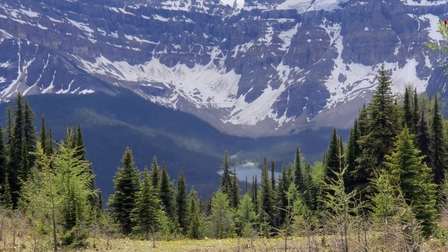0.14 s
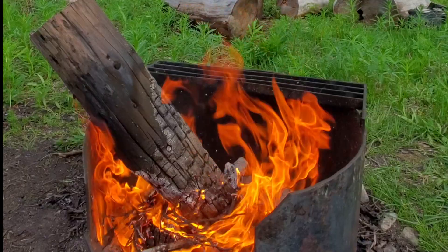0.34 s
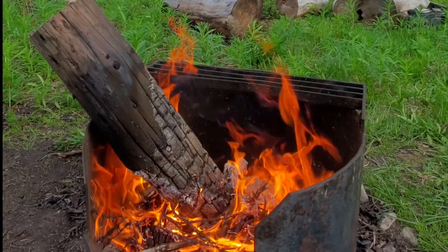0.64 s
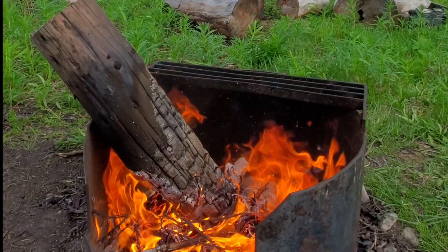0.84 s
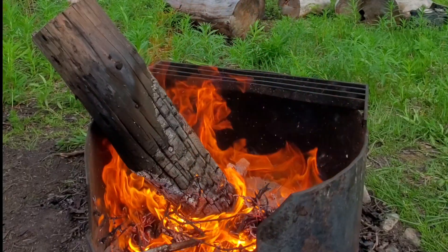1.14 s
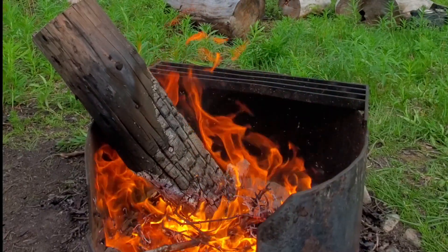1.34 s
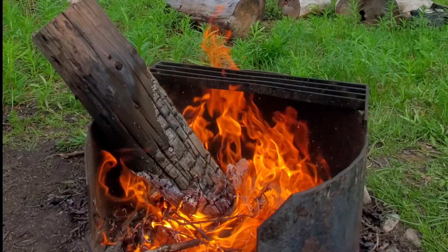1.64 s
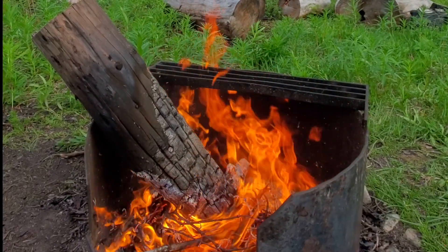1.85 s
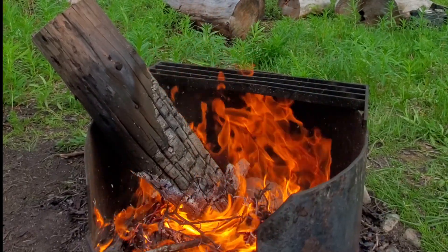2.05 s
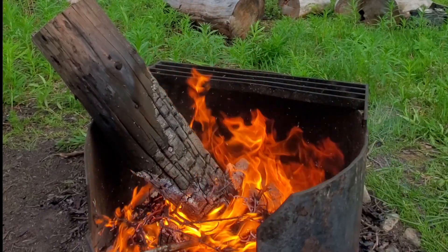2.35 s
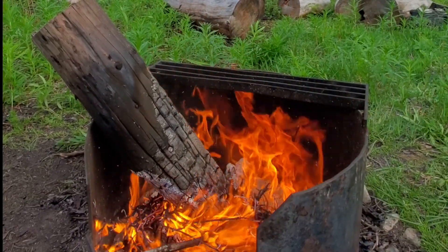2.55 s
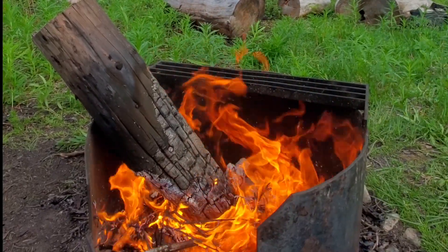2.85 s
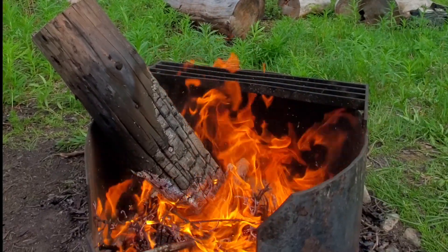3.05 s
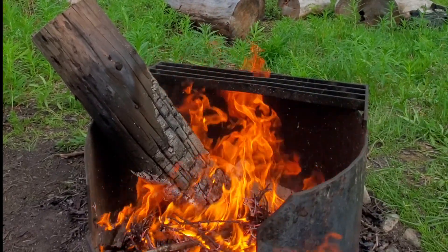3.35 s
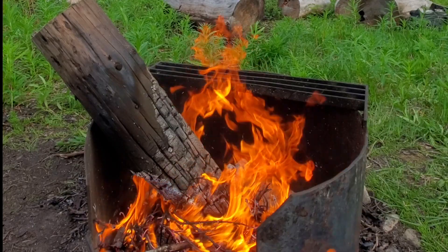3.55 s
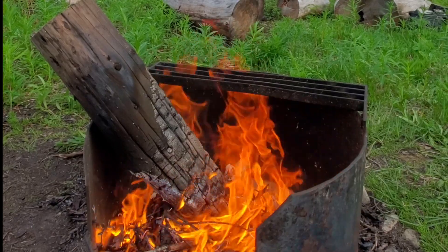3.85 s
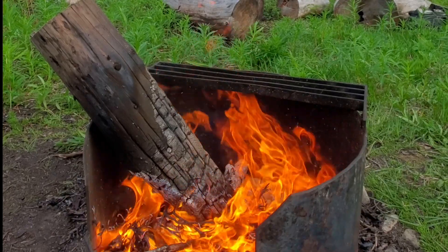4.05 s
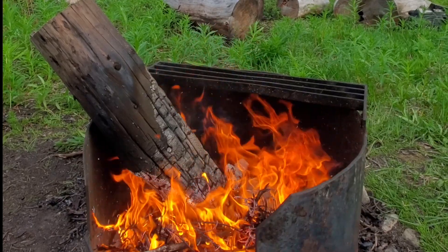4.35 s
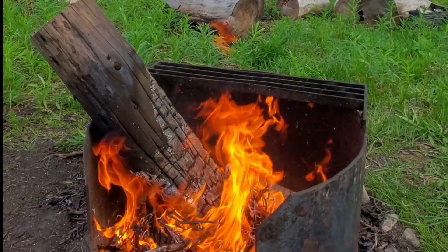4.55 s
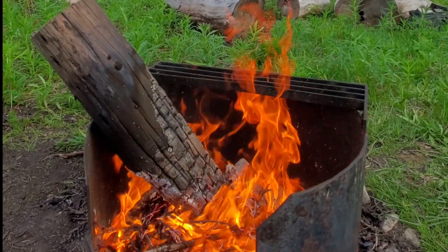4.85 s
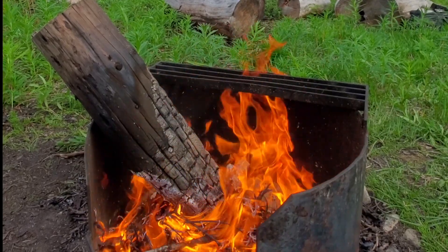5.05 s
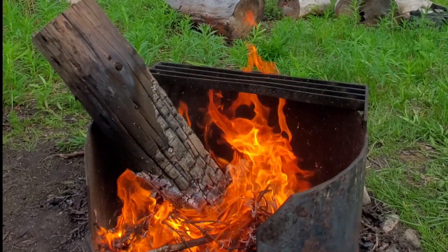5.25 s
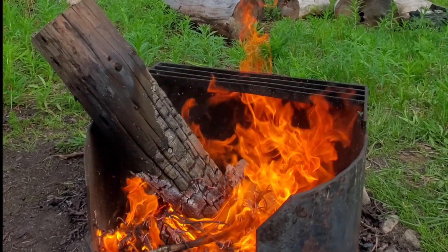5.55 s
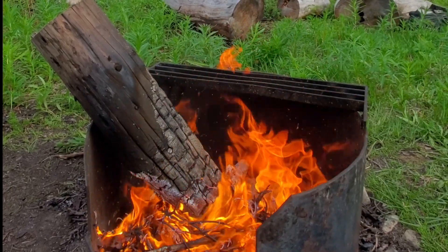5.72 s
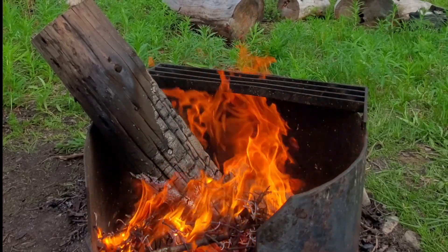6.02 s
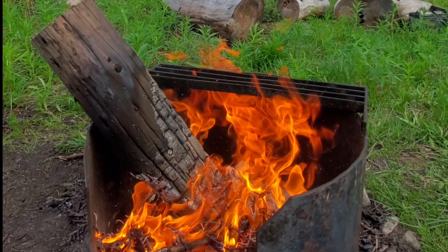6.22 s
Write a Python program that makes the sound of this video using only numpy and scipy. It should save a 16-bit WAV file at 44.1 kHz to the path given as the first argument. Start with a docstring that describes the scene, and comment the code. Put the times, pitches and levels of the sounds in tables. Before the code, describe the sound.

After a brief near-silence, a close outdoor wood fire snaps and crackles sharply over fluttering low rumble, soft hiss and tiny ember ticks.

```python
"""On a grassy campsite, a wood fire burns in a steel fire ring close to a pair of microphones. Gas pockets
burst in the logs: each crack is a short noise that scatters round the ring, rings its hollow and fades in the
clearing. Tiny ticks of the same kind come from the embers. Under them, noise swelling with the breeze makes the
flames flutter and rumble, and the wood hisses. A very faint, even noise comes first; the fire fades in after a
quarter of a second."""
import sys
import numpy as np
from scipy import signal
from scipy.fft import rfft, irfft, next_fast_len
from scipy.io import wavfile
from scipy.ndimage import uniform_filter1d

SR = 44100
rng = np.random.default_rng(int(sys.argv[2]) if len(sys.argv) > 2 else 0)


def materialize(psi):
    """Save the field psi as 16-bit PCM at rate SR to the path in sys.argv[1].

    A 1-D psi becomes a single channel; in a 2-D psi each row is a channel.
    """
    bounded = np.clip(np.atleast_2d(psi).T, -1, 1)
    quanta = np.round(bounded * 32767).astype(np.int16)
    wavfile.write(sys.argv[1], SR, quanta)


N = 281358

# samples that a burst's buffer keeps ahead of its attack
LEAD = 32


def undb(db):
    """Turn decibels into gain."""
    return 10 ** (np.asarray(db) / 20)


def curves(table):
    """Draw each column of a table as one value per sample; the first column is the time in seconds."""
    s, *columns = np.transpose(table)
    return [np.interp(np.arange(N) / SR, s, column) for column in columns]


def unit(x):
    """Scale to an rms of 1."""
    return x / np.sqrt(np.mean(x ** 2))


def colour(x, points):
    """Filter with the gain of (Hz, dB) points; the cepstrum keeps it from sounding ahead of time."""
    n = 2 * next_fast_len(x.shape[-1] * 2 // 3)
    hz, db = np.transpose(sorted(points))
    bins_hz = np.maximum(np.arange(n // 2 + 1) * SR / n, 1)
    gain = undb(np.interp(np.log(bins_hz), np.log(hz), db))
    cepstrum = irfft(np.log(gain), n)
    # fold the second half onto the first
    cepstrum[1:n // 2] *= 2
    cepstrum[n // 2 + 1:] = 0
    response = np.exp(rfft(cepstrum))
    return irfft(rfft(x, n) * response, n)[..., :x.shape[-1]]


def walk(rate):
    """Wander through random levels, each held for 1 / rate seconds, then smoothed twice; rms 1."""
    k = max(int(SR / rate), 1)
    held = np.repeat(rng.standard_normal(N // k + 1), k)
    smooth = uniform_filter1d(uniform_filter1d(held, k), k)
    return unit(smooth[:N])


def noise_pair(size, likeness):
    """White noise for two microphones that share a part of it."""
    shared = np.clip(likeness, 0, 1)
    z = rng.standard_normal((3, size))
    return np.sqrt(shared) * z[0] + np.sqrt(1 - shared) * z[1:]


def burst(envelope, likeness):
    """Noise under an envelope, with an energy of 1 in each channel."""
    x = noise_pair(len(envelope), likeness) * envelope
    return x / np.sqrt(np.sum(x ** 2, axis=1, keepdims=True))


def even(x, order=19):
    """Spread a burst's energy smoothly over frequency and start it LEAD samples in."""
    spectrum = rfft(np.roll(x, LEAD, axis=1))
    power = uniform_filter1d(np.mean(np.abs(spectrum) ** 2, axis=0), order)
    return irfft(spectrum / np.sqrt(power), x.shape[1])


def steady(x, size):
    """Even out the swells of a noise that are slower than size samples."""
    return x / np.sqrt(uniform_filter1d(np.mean(x ** 2, axis=0), size) + 1e-12)


def sides(lean_db):
    """Left and right gains of a sound that leans to one side, at constant power."""
    gains = undb(np.vstack([lean_db, -lean_db]) / 2)
    return gains / np.sqrt(np.mean(gains ** 2, axis=0))


def swells(table):
    """Summed power at each microphone of bell-shaped swells, one per row of the table."""
    t = np.arange(N) / SR
    power = np.zeros((2, N))
    for s, length, db, lean_db in table:
        bell = np.exp(-2 * ((t - s) / length) ** 2)
        power += (sides(lean_db) * undb(db) * bell) ** 2
    return power


def add(out, s, x):
    """Mix a burst in so that its attack falls at time s."""
    i = int(np.clip(s * SR - LEAD, 0, N - 1))
    out[:, i:i + x.shape[1]] += x[:, :N - i]


# The colour of the faint noise. Each row: frequency in Hz, relative level in dB.
HUSH_COLOUR = [(30, 2), (480, -3.5), (650, -2), (850, 4), (1050, -8.5), (8000, -24)]


def hush():
    """A very faint, even noise under everything."""
    return unit(colour(noise_pair(N, likeness=0.29), HUSH_COLOUR)) * undb(-75.0)


# The draught that feeds the flames builds, dies down and builds again.
# Each row: time in seconds, airflow level in dB, left minus right in dB.
DRAUGHT_CURVE = [(0.27, -45.5, -1.5), (0.8, -43, -4), (1.35, -46, -3.5), (1.7, -32.5, -1),
                 (1.95, -32.5, -1.5), (2.3, -28.5, 4), (2.7, -36.5, 17), (3.0, -29, 4), (3.35, -31.5, 10),
                 (3.52, -37.5, -16), (3.68, -61, -5), (4.28, -56, -26), (4.52, -40.5, -9), (4.87, -38, -20),
                 (5.08, -29, 1), (5.3, -26, -5), (5.72, -36.5, -4), (6.37, -41, -7)]
# Single gusts that buffet the microphones. # Each row: peak in seconds, seconds from the peak to 17 dB below
# it, airflow level in dB, # left minus right in dB.
GUST_SWELLS = [(0.94, .14, -38.5, 8), (1.25, 0.061, -37.5, -8), (1.51, 0.39, -34.5, 4),
               (1.73, 0.04, -25.5, 15), (2.385, 0.094, -28.5, 17), (2.525, .07, -23.5, 10),
               (2.648, 0.087, -20.5, 22), (2.825, 0.097, -26.5, 6), (3.127, 0.034, -18.5, 24),
               (3.254, 0.079, -17.5, 31), (3.347, 0.091, -28.5, -9), (3.596, 0.049, -32.5, -6),
               (3.793, .11, -34.5, -1), (4.039, 0.096, -37, -0.5), (6.118, .05, -34, -4),
               (6.296, 0.042, -40, 8)]


def breeze():
    """The moving air at each microphone: the powers of draught and gusts add up."""
    draught_db, lean_db = curves(DRAUGHT_CURVE)
    draught = sides(lean_db) * undb(draught_db)
    return np.sqrt(draught ** 2 + swells(GUST_SWELLS))


# The colour of the deep rumble. Each row: frequency in Hz, relative level in dB.
RUMBLE_COLOUR = [(12, -21), (25, -20), (42, -3.5), (80, -1), (115, -9), (200, -19), (350, -37.5),
                 (900, -90)]


def rumble(airflow, puffs):
    """The deep rumble of the flames: low noise that grows in step with the airflow."""
    noise = colour(noise_pair(N, likeness=0.081), RUMBLE_COLOUR)
    return undb(2.2) * airflow * steady(noise * undb(2.26 * puffs), size=2800)


# The colour of the higher roar. Each row: frequency in Hz, relative level in dB.
ROAR_COLOUR = [(50, -16), (130, -2.5), (200, 2), (280, -9), (400, -18), (600, -28), (1200, -37),
               (4000, -75)]
# the roar's level at a reference airflow, and the dB it gains per dB of airflow
ROAR_DB, REFERENCE_AIRFLOW_DB, ROAR_SLOPE = -43.5, -36, 0.6


def roar(airflow, puffs):
    """The higher roar of the flames grows more slowly with the airflow and flutters faster."""
    gain = undb(ROAR_DB) * (airflow / undb(REFERENCE_AIRFLOW_DB)) ** ROAR_SLOPE
    noise = colour(noise_pair(N, likeness=0.25), ROAR_COLOUR)
    return gain * steady(noise * undb(3.9 * puffs + 2 * walk(120)), size=3600)


# Tongues of flame that flare up and flap.
# Each row: peak in seconds, seconds from the peak to 17 dB below it, level in dB, left minus right in dB.
FLARE_SWELLS = [(3.11, 0.067, -41, 11), (3.27, .11, -36, 11), (4.99, 0.088, -40, -6), (5.29, 0.1, -36, 0),
                (5.52, 0.12, -41, 0)]
# The colour of a flaring tongue. Each row: frequency in Hz, relative level in dB.
FLARE_COLOUR = [(80, -17.5), (220, 1), (310, 1.5), (450, -8), (700, -18), (1200, -32), (4000, -62)]


def flares(puffs):
    """Flaring tongues of flame: short bell-shaped swells of fluttering noise."""
    noise = colour(noise_pair(N, likeness=0.27), FLARE_COLOUR)
    flutter = steady(noise * undb(5.0 * puffs), size=3600)
    return np.sqrt(swells(FLARE_SWELLS)) * flutter


def flames():
    """Eddies of hot gas: the same puffs swell the rumble, the roar and the flaring tongues."""
    airflow = breeze()
    puffs = walk(70)
    return rumble(airflow, puffs) + roar(airflow, puffs) + flares(puffs)


# Gas streaming out of the wood. Each row: time in seconds, level in dB before a lift of 7.5 dB.
GAS_CURVE = [(0.27, -59.5), (0.84, -62.5), (2.55, -59.5), (3.06, -60.5), (3.68, -67), (3.84, -64.5),
             (4.28, -67.5), (4.9, -58.5), (5.16, -63), (5.4, -60.5), (6.37, -59)]
# The colour of the hiss. Each row: frequency in Hz, relative level in dB.
HISS_COLOUR = [(100, -7), (350, 9), (510, 13), (750, 3.5), (1100, 4), (2000, -1.5), (3200, -8.5),
               (4500, -11.5), (5400, -15), (6700, -12), (8700, -25), (10500, -14.5), (16000, -18)]


def hiss():
    """Gas and steam stream out of the wood with a fine, restless sizzle."""
    gas_db, = curves(GAS_CURVE)
    jet = noise_pair(N, likeness=0.28) * undb(2.04 * walk(25) + 1.63 * walk(500))
    return unit(colour(jet, HISS_COLOUR)) * undb(gas_db + 7.5)


# The colour of a crack inside the ring. Each row: frequency in Hz, gain in dB.
CRACK_COLOUR = [(60, -31.5), (200, -9.5), (400, 3.5), (550, 2.5), (760, -4), (1000, -8), (1650, -2.5),
                (2600, -3.5), (3300, -4), (4400, -0.5), (5300, -6), (6400, -1), (8500, -5.5), (11500, 3),
                (16000, -6.5)]
# The two air resonances of the steel ring.
# Each row: frequency in Hz, starting level in dB, seconds to fade by 60 dB.
HOLLOW_TONES = [(217, -30, 0.042), (498, -39, .028)]


def surroundings(cracks):
    """The ring colours the cracks and its hollow rings briefly; ground and trees return a faint tail."""
    cracks = colour(cracks, CRACK_COLOUR)
    t = np.arange(SR // 2) / SR
    onset = 1 - np.exp(-t / .004)
    # the two tails fade by 60 dB in 0.037 s and 0.51 s
    ring = burst(onset * undb(-60 * t / 0.037), likeness=0.16) * undb(-20.0)
    clearing = burst(onset * undb(-60 * t / 0.51), likeness=0) * undb(-27.5)
    echo = colour(ring + clearing, [(400, -1.5), (4500, -4.0), (9000, -15), (16000, -12)])
    low, high = (np.sin(2 * np.pi * hz * t) * undb(db - 60 * t / t60) for hz, db, t60 in HOLLOW_TONES)
    # the two tones have opposite signs: between their pitches the air swings against the direct sound
    return cracks + signal.fftconvolve(cracks, echo + low - high, axes=1)[:, :N]


def pop(body_db, top_db, tear_size, size=1024):
    """The wood splits, fibres tear for a moment, a splinter rings, and the steel walls scatter the crack."""
    ms = np.arange(size) / SR * 1000
    tear_size = max(tear_size, .1)
    tear_ms = 1.2 * tear_size
    split = burst(np.exp(-ms / 0.2), likeness=0.88)
    tear = burst(np.exp(-(ms / tear_ms) ** 2), likeness=0.77)
    scatter = burst((1 - np.exp(-ms / .5)) * np.exp(-ms / 2.22), likeness=0.27)
    # a long tear outweighs the first split
    crack = even(undb(-8.5) / np.sqrt(tear_size) * split + tear + undb(-3.5) * scatter)
    # every splinter has a pitch of its own
    splinter_hz = rng.uniform(3980, 7600)
    splinter = np.sin(2 * np.pi * splinter_hz * ms / 1000) * np.exp(-ms / 0.62)
    crack = crack + undb(-26.5) * np.roll(splinter, LEAD)
    return colour(crack, [(700, body_db - 1.0), (2200, body_db), (3900, 0.028), (6300, 0.0037), (9000, top_db)])


def embers(count=280):
    """Tiny bright ticks at random moments, most of them faint; all lean to the right."""
    out = np.zeros((2, N))
    for when, strength, woody, bright, side in rng.random((count, 5)):
        # the high power makes strong ticks rare
        db = -39 + 20 * strength ** 6
        tick = pop(-8 + 9 * woody, -3 + 9 * bright, tear_size=0.44, size=512)
        lean_db = 2.4 * (side - 1.5) * np.array([[1], [-1]])
        add(out, when * N / SR, tick * undb(db + lean_db))
    return out


# a deeper pocket tears for longer: relative tear at a body of 0 dB, and the body that doubles it
TEAR_SIZE, TEAR_DOUBLING_DB = 0.73, 16.5
# crumbs of char: mean delay, level below the pop, cap on that level, and random scatter added after it
CRUMB_DELAY_S, CRUMB_BELOW_DB, CRUMB_CAP_DB, CRUMB_SCATTER_DB = .025, 22.5, -23, 3.5
# The distinct bursts in the wood, before the colour of the ring.
# Each row: start in seconds, level in dB before a common lift, woody body in dB, bright top in dB,
# left minus right in dB.
POP_EVENTS = [(0.2758, -11.5, -6, -1, -12), (0.2979, -13.5, 0, 10, -5), (0.306, -4, -10, -10, 7),
              (0.3229, 0.5, -7.5, -3, -2), (0.411, 4, -16, -5, 0), (0.4271, -1, -4.5, -4, -1.5),
              (0.621, -8.5, -4, -3, -2), (0.6426, 5.5, 0.5, -3.5, 4.5), (0.6446, 9.5, 3, -5, -4),
              (0.7649, -5.5, -14, -0.5, -3), (0.9809, -5.5, 0.5, -4.5, -1), (1.062, -3.5, -5.5, -1.5, -0.5),
              (1.1163, -2, -4, -2, -4.5), (1.122, -5, -14, -4, -2), (1.2023, -18, -13, 4, 0),
              (1.2296, -10.5, -9, -5, -2), (1.2396, -7.5, -2.5, -3.5, -2), (1.3186, -11, 1, -6.5, -3),
              (1.4377, -1.5, -4, 2, -4), (1.5379, 1.5, -4, 2.5, -3.5), (1.6138, 0, -19, 0, 0),
              (1.844, -5.5, -1.5, -1, -1), (1.9796, -4, 0, -1, -2.5), (2.161, 1.5, -6.5, 0.5, -4),
              (2.1763, -7.5, -1.5, -4, -1), (2.4027, -5, 3.5, -14, -3.5), (2.6309, 1, -9.5, -4, -4),
              (2.6765, -2, -5.5, 3, -6), (2.6842, -6.5, -1, 4, -3), (2.8164, -14.5, 5.5, -4, -1),
              (2.958, -3, 7, 0, 1), (2.9688, 5.5, -4, -10, 1), (3.021, 3.5, 2.5, -12, -24),
              (3.022, 11, 5, -14.5, 2.5), (3.1538, 4, -11.5, -2, -4), (3.2364, 0.5, -7, -1, -1),
              (3.3075, -15.5, -3, 1, -1), (3.4484, -12.5, -0.5, -5, -2), (3.4709, -6.5, 0, -24, 0),
              (3.4937, -14.5, -1, -4, -3), (3.719, -6, -18, -2, -2), (3.7742, -8.5, -2, 0, -0.5),
              (3.8451, -5, -7.5, -5, -3), (3.9975, 6, -2.5, -15.5, -4.5), (4.1787, -14, 5, -0.5, -3.5),
              (4.221, -14, -4, -6, 0), (4.3461, -6.5, -19, -1.5, -2), (4.4329, -12.5, -1.5, -6.5, -1),
              (4.4811, -12.5, 4.5, 3.5, -4.5), (4.7177, 1.5, -16, -5, 1), (4.7508, 2, 3, 1, 1.5),
              (4.8733, -3.5, -10, -4.5, 1), (5.043, -12, -4, 1, 0), (5.3316, -3, -20, -6, 0),
              (5.35, -4, -8, 1, -3.5), (5.4217, -1, -7, -0.5, -1), (5.474, 1.5, -6, 0, -1.5),
              (5.553, -9.5, 1, -0.5, -1), (5.5673, -9.5, -2, 0.5, 1), (5.6136, -10.5, 0, 6, -0.5),
              (5.7696, -14, 0, -1.5, 1), (5.8148, -13, -28, -1, -1), (5.8655, -4.5, -15, 2.5, 2.5),
              (5.9587, -5, -1.5, -7, 2), (6.063, -9.5, -8, -8.5, -3), (6.1027, 1.5, -11.5, -5, -4),
              (6.1293, 0, -12, -0.5, -2), (6.177, -6.5, -4.5, -7, 1), (6.2684, -9, -8, -1, -1.5),
              (6.311, -5, -2.5, -8, 1)]


def pops():
    """Gas pockets burst in the logs with a snap, and each burst dislodges two small crumbs of char."""
    out = np.zeros((2, N))
    for s, db, body_db, top_db, lean_db in POP_EVENTS:
        side = undb(np.array([[lean_db], [-lean_db]]) / 2)
        tear_size = TEAR_SIZE * 2 ** (body_db / TEAR_DOUBLING_DB)
        add(out, s, pop(body_db, top_db, tear_size) * undb(db) * side)
        for wait, luck in zip(rng.exponential(size=2), rng.standard_normal(size=2)):
            crumb_db = min(db - CRUMB_BELOW_DB, CRUMB_CAP_DB) + CRUMB_SCATTER_DB * luck
            crumb = pop(body_db=-2.5, top_db=-4.5, tear_size=.6, size=512)
            add(out, s + CRUMB_DELAY_S * wait, crumb * undb(crumb_db) * side)
    return out * undb(1.05)


def scene():
    """A faint, even noise, then the fire; it lies to the right, so its cracks and hiss reach the left side
    later."""
    quiet = hush()
    fire = hiss() + surroundings(embers() + pops())
    # the left microphone lags by 10 samples
    fire[0] = np.roll(fire[0], 10)
    fire_start_s, fade_s = .25, 0.014
    fade_in = np.clip((np.arange(N) / SR - fire_start_s) / fade_s, 0, 1) ** 2
    return quiet + fade_in * (flames() + fire)


def record(dry):
    """The microphones lose the deepest bass; the recorder clips the highest peaks and cuts the top."""
    low_cut_hz, top_hz = 34, 16500
    heard = signal.sosfilt(signal.butter(2, low_cut_hz, "high", fs=SR, output="sos"), dry)
    clipped = np.clip(heard, -.88, .88)
    return signal.sosfilt(signal.ellip(8, .2, 70, top_hz, fs=SR, output="sos"), clipped)


dry = scene()
out = record(dry)
materialize(out)
```